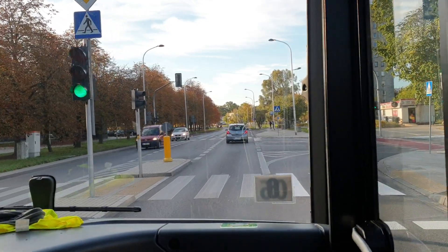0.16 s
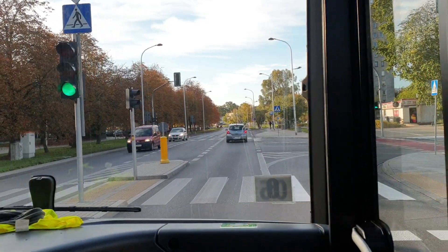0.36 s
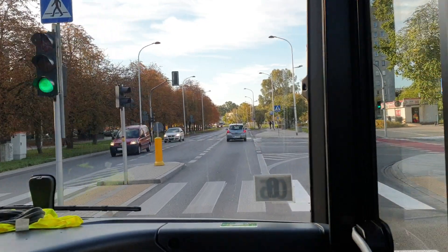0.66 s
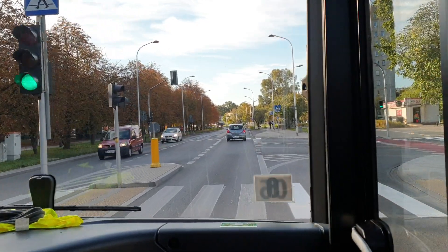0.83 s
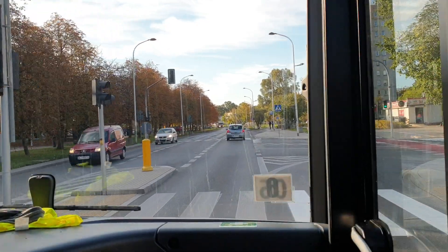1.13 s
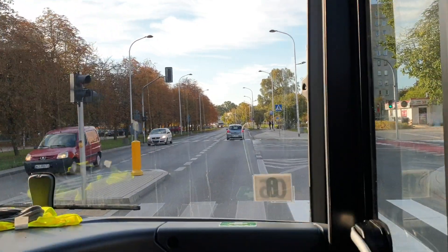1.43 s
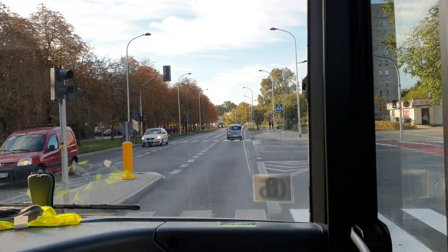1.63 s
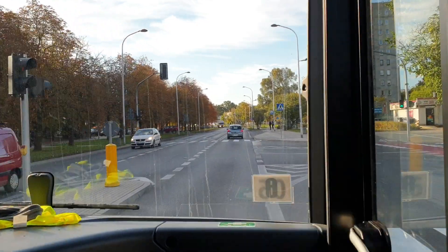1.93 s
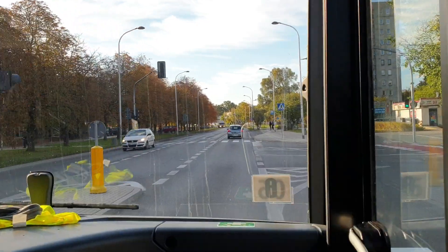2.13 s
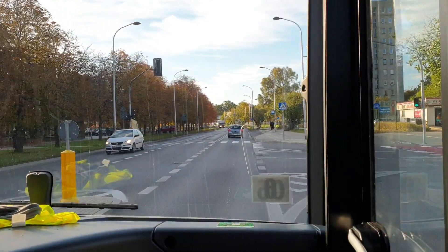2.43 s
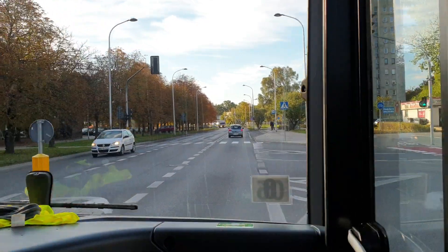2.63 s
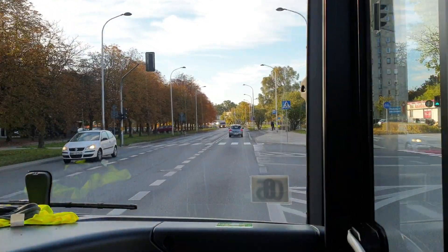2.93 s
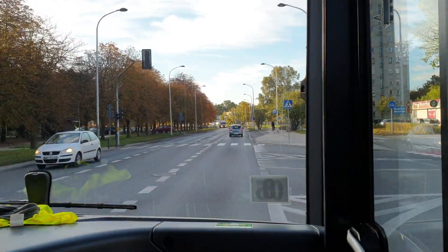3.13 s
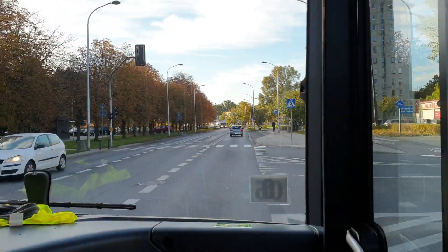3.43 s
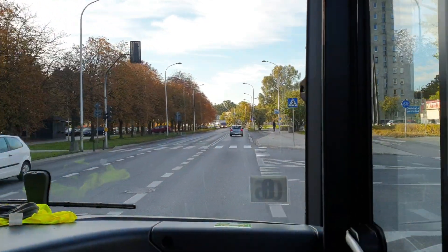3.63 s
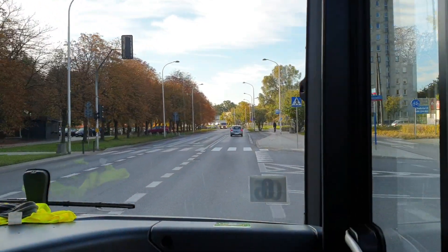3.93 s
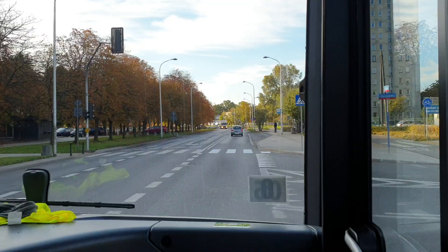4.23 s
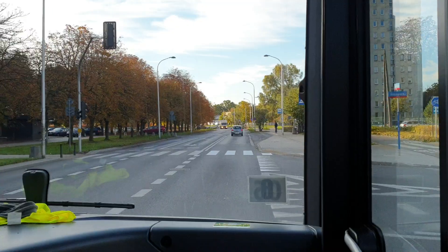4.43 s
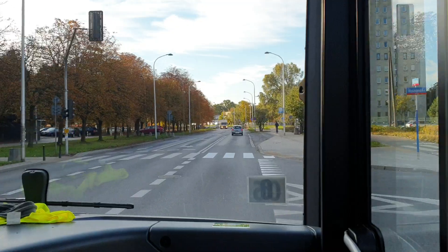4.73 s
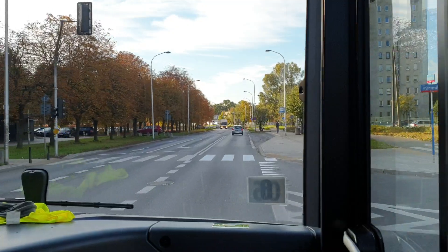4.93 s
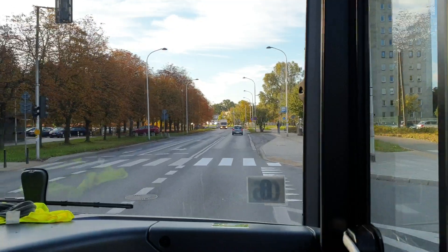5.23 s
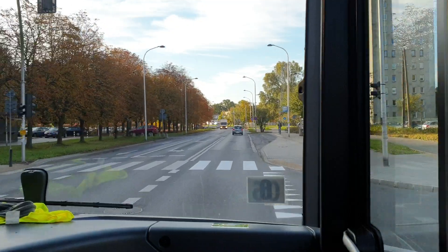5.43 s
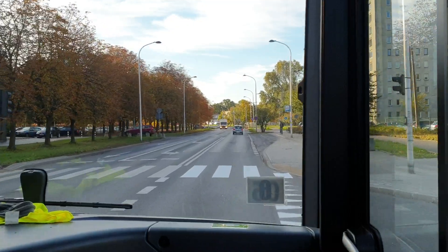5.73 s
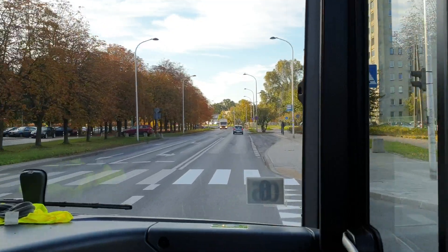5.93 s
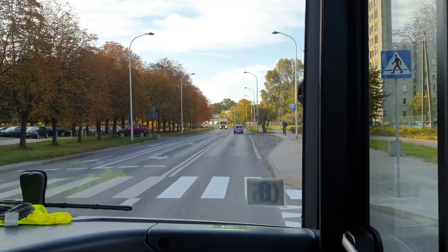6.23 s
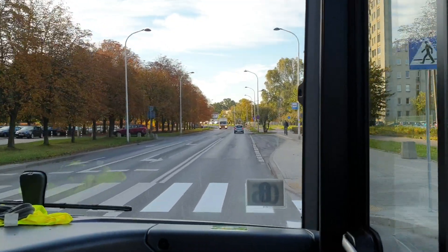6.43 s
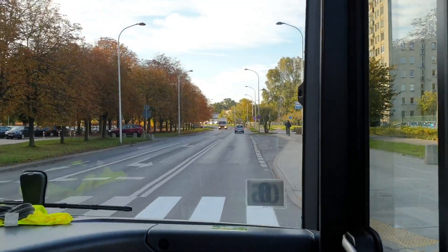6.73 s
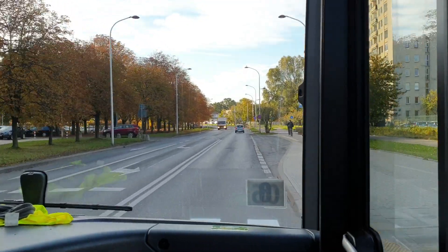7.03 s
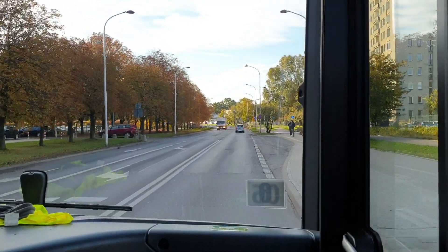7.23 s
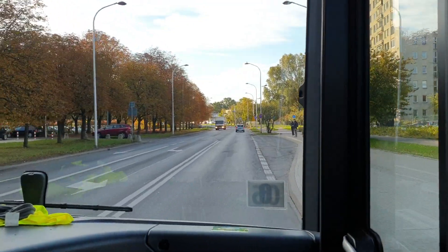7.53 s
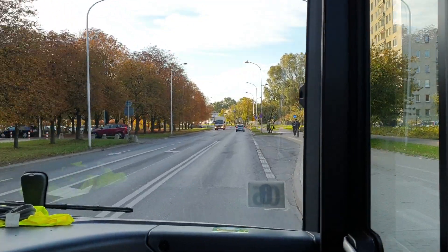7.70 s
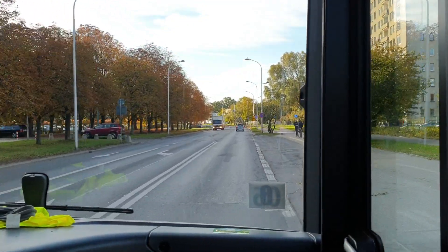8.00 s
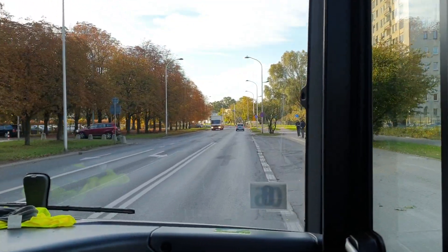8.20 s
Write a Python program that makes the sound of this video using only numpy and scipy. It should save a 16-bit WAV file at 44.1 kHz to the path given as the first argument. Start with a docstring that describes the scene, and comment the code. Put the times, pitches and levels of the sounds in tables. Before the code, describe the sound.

Inside an electric bus pulling away, a steady deep hum drones while tyre rumble grows, trim panels rattle and faint air puffs hiss.

```python
"""A compressor drones at a fixed shaft speed inside an electric city bus that pulls away, heard near the windscreen:
sines on shaft orders. Gliding sines make the driveline moans, the motor whine and the inverter tones.
Shaped noise makes the tyre and air rush, the singing duct and the puffs of the air valves.
Noise bursts through resonances rattle the trim panels, louder on the right; short damped rings click close by."""
import sys
import numpy as np
from scipy import signal
from scipy.fft import rfft, irfft, next_fast_len
from scipy.io import wavfile
from scipy.ndimage import uniform_filter1d, map_coordinates

SR = 44100
rng = np.random.default_rng(int(sys.argv[2]) if len(sys.argv) > 2 else 0)


def master_out(mix):
    """Clip the mix to full scale and print it as 16-bit PCM to the path in sys.argv[1]."""
    frames = np.transpose(np.atleast_2d(mix))
    ceiling = np.clip(frames, -1, 1)
    pcm = np.round(ceiling * 32767).astype(np.int16)
    wavfile.write(sys.argv[1], SR, pcm)


N = 368675

# stereo image: (frequency [Hz], left-right likeness [0..1], left-right level [dB], lead of the left [rad])
STEREO_IMAGE = [(35, .93, -2, .6), (130, .95, -2, .2), (240, .82, -.5, 0), (330, .45, 0, 0),
                (520, .55, -2.5, .4), (900, .3, -4, 1.3), (1200, .35, -7, 2.8), (1450, .15, -9, 3.5),
                (2000, .05, -1, 3.5), (3000, 0, -1.5, 3.5), (15000, 0, 0, 3.5)]
# motor whine pitch, which also stands for road speed: (time [s], pitch [Hz])
WHINE_PITCH = [(0, 900), (1.7, 1510), (2.5, 1800), (3.2, 2010), (4.2, 2250), (4.75, 2395), (5.25, 2482),
               (5.6, 2520), (6.3, 2550)]


def amp(db):
    """Gain of a level in dB."""
    return 10 ** (np.asarray(db) / 20)


def unit(x):
    """x at rms 1."""
    return x / np.sqrt(np.mean(x ** 2) + 1e-20)


def along(points, hz):
    """Columns of (Hz, value, ..) points, interpolated on a log axis."""
    f, *cols = np.transpose(points)
    return np.squeeze([np.interp(np.log(hz + 1), np.log(f + 1), c) for c in cols])


def curves(rows):
    """One value per sample for each column after the time."""
    s, *cols = np.transpose(rows)
    return [np.interp(np.arange(N) / SR, s, c) for c in cols]


def wobble(knots_per_s):
    """Smooth random curve through normally distributed knots."""
    knots = rng.standard_normal(int(N * knots_per_s / SR) + 4)
    return map_coordinates(knots, [np.arange(N) * knots_per_s / SR])


def gate(start_s, end_s, fade_s):
    """Linear fade in from the start and out to the end."""
    t = np.arange(N) / SR
    return np.clip(np.minimum(t - start_s, end_s - t) / fade_s, 0, 1)


def filtered(x, response):
    """x times a complex response of frequency."""
    m = next_fast_len(x.shape[-1] + 8192)
    spectrum = rfft(x, m) * response(np.fft.rfftfreq(m, 1 / SR))
    return irfft(spectrum, m)[..., :x.shape[-1]]


def panned(x, side_db):
    """Stereo with a left-right level difference."""
    return x * amp([[side_db / 2], [-side_db / 2]])


def tone(hz, rms_db, lead_rad=0):
    """Stereo sine on a pitch curve; the left leads in phase."""
    phase = 2 * np.pi * np.cumsum(hz * np.ones(N)) / SR + rng.uniform(0, 2 * np.pi)
    return np.sqrt(2) * amp(rms_db) * np.sin([phase + lead_rad, phase])


def modes(table, hz):
    """Causal response of resonances (Hz, width Hz, dB), summed with alternating sign."""
    total = 0
    for i, (center_hz, width_hz, db) in enumerate(table):
        damping = 1j * hz * width_hz
        total = total + (-1) ** i * amp(db) * damping / (center_hz * center_hz - hz * hz + damping)
    return total


def rush(spectrum, patchy_db):
    """Diffuse stereo noise of rms 1: random gain patches in time and frequency, then spectrum and stereo image."""
    z = signal.stft(rng.standard_normal((2, N)), nperseg=512)[2]
    patches = rng.standard_normal(z.shape[1:])
    patches = uniform_filter1d(uniform_filter1d(patches, 6, 0), 10, 1)
    pair = signal.istft(z * amp(patchy_db * unit(patches)), nperseg=512)[1][:, :N]

    def mid_side(hz):
        angle = np.arccos(along(STEREO_IMAGE, hz)[0]) / 2  # sets the likeness of left and right
        return amp(along(spectrum, hz)) * [np.cos(angle), np.sin(angle)]

    def lean(hz):
        _, side_db, lead_rad = along(STEREO_IMAGE, hz)
        return amp(np.outer([.5, -.5], side_db)) * np.exp(np.outer([.5j, -.5j], lead_rad))

    mid, side = filtered(pair, mid_side)
    return unit(filtered(np.array([mid + side, mid - side]), lean))


def compressor():
    """Lines on multiples of one steady shaft; cabin modes make each louder on one side, the second order booms."""
    shaft_hz = 51.213
    boom_db, sway_s = -20.5, .11
    # brief dips and swells of the boom: (time [s], level change [dB])
    boom_sways = [(5.33, -1), (6.85, -2), (7.06, -0.5), (7.87, 1.3), (8.02, -0.5)]
    # shaft orders: (multiple of shaft speed, mean level [dB], left-right level [dB])
    orders = [(1, -36, -1.5), (4, -45.5, -2.5), (5, -57, -1), (9, -60, 0), (13, -55.5, -2),
              (19, -72, -18.5), (24, -71, -7), (25, -72, -12), (26, -73.5, -17), (27, -64.5, -6),
              (28, -77, -10), (29, -75, -14), (39, -86, 11.5), (48, -77, 4), (73, -93, 2)]
    t = np.arange(N) / SR
    boom_db = boom_db + sum(db * np.exp(-((t - s) / sway_s) ** 2) for s, db in boom_sways)
    hum = panned(tone(2 * shaft_hz + .04 * wobble(3), boom_db + .5 * wobble(7), lead_rad=.3), -2.1)
    for k, db, side_db in orders:
        lead_rad = along(STEREO_IMAGE, k * shaft_hz)[2] * (k < 29)
        hum += panned(tone(k * shaft_hz, db + 1.1 * wobble(3), lead_rad), side_db)
    return hum


def moans():
    """Driveline moans and shudders: each sine glides upward, swells to its middle and fades."""
    # (start [s], length [s], from [Hz], to [Hz], middle level before flutter [dB], waver [Hz])
    glides = [(0.198, .7, 398, 492, -49.5, 9), (0.481, 0.62, 134, 169, -37.5, 4.1),
              (1.195, 0.64, 140, 171.7, -35.5, 3), (1.902, .4, 53.5, 57.3, -28, 0.57),
              (2.256, .26, 56.1, 59.3, -22.5, 0.91), (2.442, .72, 58.1, 60.6, -23.5, 0.59),
              (3.005, 0.58, 60, 66.2, -30, 0.97), (6.208, 0.66, 59.2, 63.4, -30.5, .8)]
    edge_drop_db = 17.5  # start and end against the middle
    out, waver, flutter_db = 0, wobble(25), 1.5 * wobble(25)
    for start_s, length_s, from_hz, to_hz, db, waver_hz in glides:
        u = (np.arange(N) / SR - start_s) / length_s
        hz = from_hz + (to_hz - from_hz) * np.clip(u, 0, 1)
        swell_db = db - edge_drop_db * (2 * u - 1) ** 2
        out = out + tone(hz + waver_hz * waver, swell_db + flutter_db, lead_rad=.2)
    return panned(out, -2)


def road():
    """Tyre and airflow noise through floor and glass in four bands that rise with speed, plus air and a duct."""
    # noise spectra, lowest band first: (frequency [Hz], relative density [dB per Hz])
    thud_spectrum = [(12, -30), (20, -20), (33, -5.5), (42, -2.5), (60, 5), (78, -0.5), (115, -3.5),
                     (135, -10.5), (180, -120)]
    body_spectrum = [(90, -120), (115, -6.5), (130, -1.5), (158, -2.5), (185, -8), (262, -7.5), (320, -15),
                     (500, -18.5), (720, -22.5), (900, -27.5), (1300, -120)]
    tyre_spectrum = [(450, -120), (700, 0), (850, -4), (1050, -2), (1350, -1.5), (1550, -7), (1750, -10.5),
                     (2300, -16.5), (2700, -23), (3000, -33.5), (4000, -120)]
    hiss_spectrum = [(1800, -120), (2500, -5), (2850, 0.5), (3500, -3), (4300, -8), (5250, -11.5),
                     (5600, -23), (6500, -32.5), (9000, -120)]
    air_spectrum = [(3500, -120), (5200, -11.5), (6200, -9), (7700, -16.5), (8600, -10), (9200, -3),
                    (9700, 1.5), (11300, -3), (12000, -7), (15500, -8)]
    # road roughness before each band's share: (time [s], level [dB])
    roughness = [(0, 0.5), (1.6, -0.5), (2.8, 0.5), (3.7, -0.5), (4.35, 0), (5.2, -1.8), (5.7, 0.5),
                 (6.4, -1), (6.9, 2), (7.4, -2.5), (8.3, 2.5)]
    (whine_hz,), (rough_db,) = curves(WHINE_PITCH), curves(roughness)
    slow = 1 - whine_hz / whine_hz.max()
    bumps = wobble(9)  # road unevenness shared by the four bands

    def level(full_db, lost_db, rough_share, bump_db):
        return amp(full_db - lost_db * slow + rough_share * rough_db + bump_db * bumps)

    out = level(-34, 7.4, 2.4, .64) * rush(thud_spectrum, patchy_db=1.0)
    out += level(-38, 8.8, 1, .6) * rush(body_spectrum, patchy_db=1.3)
    out += level(-51.5, 5.4, .31, 1.0) * rush(tyre_spectrum, patchy_db=.44)
    out += level(-73, 6.5, 1.3, .81) * rush(hiss_spectrum, patchy_db=2)
    out += amp(-79.0 + .7 * wobble(4)) * rush(air_spectrum, patchy_db=3)
    # a ventilation duct sings on noise
    duct_hz, duct_width_hz, duct_rms_db = 571, 20, -53
    draught = rush([(300, -120), (450, -1.0), (700, -1.5), (1000, -120)], patchy_db=-2.3)
    duct = filtered(draught, lambda f: modes([(duct_hz, duct_width_hz, 0)], f) ** 2)
    return out + amp(duct_rms_db) * unit(duct)


def rattles():
    """Knocks chatter a few ms into the panel modes; fainter random ones grow denser with time."""
    # panel resonances: (frequency [Hz], width [Hz], gain [dB])
    panel = [(444, 170, 4.5), (850, 360, -2.5), (1110, 33, 8), (1527, 130, 4.5), (1796, 96, -2.5),
             (2020, 330, -5), (2500, 310, -4), (3300, 630, -19)]
    # knocks: (time [s], relative strength [dB], low part [dB], high part [dB])
    knocks = [(3.0788, -29, 5.5, -5), (3.4925, -27, -1, 0), (3.6028, -30.5, 4, -4),
              (3.911, -35.5, -.5, -.5), (3.941, -36.5, 0, 2.5), (3.9982, -36.5, -1, -1),
              (4.2712, -31.5, .5, -3.5), (4.3647, -30, 3.5, -3), (4.5311, -32, 6, 2),
              (4.578, -33, .5, -7.5), (4.627, -31, 0, 2.5), (4.727, -31, 6, -4.5), (5.688, -32.5, 0, -4),
              (5.73, -34.5, 9, -1), (5.772, -34.5, 6, 1.5), (5.833, -30.5, 6.5, -2), (5.8695, -27, 6, -4),
              (5.9205, -33.5, -4.5, -6), (5.9797, -29.5, -2, 0), (6.2365, -34.5, -2, 4.5),
              (6.292, -35, -4.5, -5), (6.678, -32.5, -3, -3.5), (6.989, -31, -1.5, 4.5),
              (7.075, -35, 3, -6), (7.1006, -35, -3, 2), (7.1297, -28.5, 7.5, 0), (7.1875, -35, 0, -1.5),
              (7.635, -34.5, -5.5, -5.5), (7.678, -29, 9, 1), (7.7221, -33.5, 0, -2), (7.78, -36, -2, -5),
              (7.835, -36, 0, 0), (7.8963, -25, 1, -8), (8.0078, -27.5, 2, 4), (8.0555, -36, 0, 1),
              (8.1105, -32.5, 7, -4), (8.1655, -35, -3.5, 1), (8.2245, -30.5, 5, -7), (8.271, -31.5, 0, -5),
              (8.327, -30, -1.5, -4)]
    # left channel against right: (frequency [Hz], level [dB], lead of the left [rad])
    panel_left = [(600, -3, 2.5), (1000, -9, 1.6), (1750, -9, 1.6), (2100, -2, 3.6), (3500, -2, 4.4)]
    first_s, faint_count, faint_db, faint_high_db = 2.8, 90, -44, -2.5
    chatter_s = .008
    when_s = first_s + (N / SR - first_s) * rng.random(faint_count) ** .7
    strength_db = faint_db + 2.5 * rng.standard_normal(faint_count)
    faint = np.c_[when_s, strength_db, np.zeros(faint_count), np.full(faint_count, faint_high_db)]
    t = np.arange(SR // 10) / SR
    envelope = .8 * np.exp(-(t / chatter_s) ** 2) + .17 * amp(-60 * t / .3)
    out = np.zeros((2, N + len(t)))
    for s, db, low_db, high_db in list(knocks) + list(faint):
        chatter = rng.standard_normal((2, len(t))) * envelope
        chatter[1, 0] = 12  # the first contact is the hardest
        chatter[0] = .4 * chatter[1] + .9 * chatter[0]
        tilt = lambda f: amp(np.interp(f, [840, 1010, 1770, 2030], [low_db, 0, 0, high_db]))
        knock = filtered(chatter, lambda f: modes(panel, f) * tilt(f))
        out[:, round(s * SR):][:, :len(t)] += amp(db) * knock

    def contact(f):
        soft = 1 / (1 + 1j * f / 4500) ** 3  # padded contacts carry little treble
        left_db, lead_rad = along(panel_left, f)
        return soft * [amp(left_db) * np.exp(1j * lead_rad), np.ones(len(f))]

    return amp(4.5) * filtered(out[:, :N], contact)


def clicks():
    """Dry close snaps: a contact-limited edge and barely one cycle of ring, with a faint scrape around the loudest."""
    # (time [s], relative strength [dB], pitch [Hz], edge cutoff [Hz], left-right level [dB])
    snaps = [(.1608, -46, 2300, 4500, -20), (.167, -31, 950, 2600, -22), (.1678, -35, 12000, 19000, -23),
             (.347, -45, 2000, 4500, -20.5), (.634, -32, 500, 2800, 15), (.6374, -42, 2950, 5000, -5.5),
             (.6579, -35.5, 4300, 5500, -1.5), (.6579, -27.5, 1900, 3000, -1.5),
             (.6658, -35.5, 3700, 6000, 3), (.6658, -21.5, 1800, 3000, 5), (.666, -19, 460, 2300, 7.5),
             (.6684, -16, 190, 700, 9.5), (3.0362, -36, 1500, 4200, -7.5), (7.7107, -45, 3800, 7000, 0)]
    t = np.arange(SR // 25) / SR
    out = np.zeros((2, N))
    for s, db, hz, edge_hz, side_db in snaps:
        ring = np.cos(2 * np.pi * hz * t) * np.exp(-t * hz / .85)
        fuzz = .11 * rng.standard_normal((2, len(t))) * np.exp(-t / .0015)
        edge = lambda f: 1 / (1 + 1.4j * f / edge_hz - (f / edge_hz) ** 2) ** 3
        snap = filtered(ring + fuzz, edge)
        out[:, round(s * SR):][:, :len(t)] += panned(amp(db) * snap, side_db)
    scrape_start_s, scrape_end_s, scrape_db = .63, .68, -71
    scrape_hz, scrape_width_hz = 3900, 1500
    grain = amp(3 * wobble(300))
    grit = grain * filtered(rng.standard_normal(N), lambda f: modes([(scrape_hz, scrape_width_hz, 0)], f) ** 2)
    out += amp(scrape_db) * gate(scrape_start_s, scrape_end_s, .02) * unit(grit)
    return filtered(out, lambda f: 1j * f / (120 + 1j * f))  # high-pass


def valves():
    """Puffs of compressed air: quick opening, then fading jet noise in a high and a lower band."""
    # (time [s], level before opening and sputter [dB], lower band against high [dB], time to fade 20 dB [s])
    puffs = [(.1221, -73, -8, .1), (.42, -75, -9, .1), (1.1428, -74, -9, .08), (1.99, -75, -6, .09),
             (3.3473, -70, -8, .07), (3.494, -73, 2, .1), (5.45, -65, -4, .1), (5.8686, -75, 6, .06),
             (6.13, -69, -6, .07), (6.1754, -67, -1.5, .1), (6.5286, -68, 9, .13),
             (6.7221, -67.5, -12, .13), (6.7905, -69, 3, .1), (6.83, -68, 1, .19), (6.992, -64.5, -1, .11),
             (7.1422, -67, -19, .03), (7.2444, -71, -14.5, .03), (7.3612, -70, -5, .09),
             (7.4669, -69, -19, .04), (7.5742, -70, -3, .1), (7.7099, -61.5, .5, .08), (7.83, -82, 13, .16),
             (8.1668, -68, -8, .08), (8.1883, -71, -4, .11), (8.3105, -68, 2, .07)]
    # jet spectra: (frequency [Hz], relative density [dB per Hz])
    jet_high = [(5000, -120), (6500, -19), (8500, -13.5), (9200, -3), (10200, -1.5), (11400, -3.5),
                (12200, -12), (15500, -14)]
    jet_low = [(1200, -120), (2000, -19.5), (2700, 6.5), (3500, 3.5), (5200, -8.5), (5800, -7), (7000, -11),
               (9500, -120)]
    nozzle_hz, nozzle_width_hz, nozzle_db = 5000, 160, 6  # the lower band rings here
    open_s, low_open_s = .0018, .002
    high, low, t = np.zeros(N + SR), np.zeros(N + SR), np.arange(SR // 2) / SR
    for s, db, low_db, fade_s in puffs:
        flow = amp(db - 20 * (t / max(fade_s, .01)) ** 2) * (1 - np.exp(-t / open_s))
        high[round(s * SR):][:len(t)] += flow
        low[round(s * SR):][:len(t)] += flow * amp(low_db) * (1 - np.exp(-t / low_open_s))
    high_jet = rush(jet_high, patchy_db=2)
    nozzle = lambda f: 1 + modes([(nozzle_hz, nozzle_width_hz, nozzle_db)], f)
    low_jet = filtered(rush(jet_low, patchy_db=3), nozzle)
    sputter = amp(1.8 * wobble(70))  # uneven flow
    return sputter * (high[:N] * high_jet + low[:N] * low_jet)


def drive():
    """Motor whine, and inverter tones that spread from their carrier as the motor current speeds up."""
    # switching rates, stepping up: (start [s], end [s], carrier [Hz], base level near it [dB], near its double [dB])
    carriers = [(.8, 4.17, 4000, -85, -101.5), (4.1, 6.12, 4999, -89, -84)]
    # swell of the inverter tones: (time [s], near the carrier [dB], near its double [dB])
    tone_swell = [(3.2, -2, 0), (3.42, 6, 0), (3.7, -2, 0), (4.05, 4, 0), (4.3, 5, 3), (4.7, 2, 1),
                  (5.1, 0, 0), (5.38, -6, 5), (5.52, 7, 2), (5.75, -3, -5), (6.1, -5, -8)]
    # (multiple of carrier, multiple of current frequency, relative level [dB])
    sidebands = [(1, -3, -2), (1, 3, -1), (2, -2, -1.5), (2, 0, 0), (2, 2, -1.5)]
    whine_db, peak_hz, peak_width_hz, peak_lift_db = -78.5, 2472, 70, 14.5  # a resonance lifts the whine
    pull_start_s, pull_end_s = 1.3, 5.75
    whine_per_current = 21.4  # frequency ratio
    slow_loss_db = 30  # lost near the carrier as whine pitch goes to zero
    whine_hz, = curves(WHINE_PITCH)
    level_db = whine_db + peak_lift_db / (1 + ((whine_hz - peak_hz) / peak_width_hz) ** 2)
    whine = tone(whine_hz + 5 * wobble(9), level_db + 2.5 * wobble(12), lead_rad=1.5)
    out = gate(pull_start_s, pull_end_s, .3) * whine
    drift_hz = 4 * wobble(8)
    # thin converter tone, on from the outset
    out += gate(-1, 4.15, .1) * tone(9998 + drift_hz, -92 + 3 * wobble(15), lead_rad=1.1)
    slow = 1 - whine_hz / whine_hz.max()
    near_swell_db, double_swell_db = curves(tone_swell)
    for m, k, db in sidebands:
        flicker_db = 3.5 * wobble(7) + 2 * wobble(30)
        for start_s, end_s, carrier_hz, near_db, double_db in carriers:
            if m == 1:
                band_db = near_db + near_swell_db - slow_loss_db * slow
            else:
                band_db = double_db + double_swell_db
            hz = m * carrier_hz + k * whine_hz / whine_per_current
            sideband = tone(hz + drift_hz, db + flicker_db + band_db, lead_rad=1.1)
            out += gate(start_s, end_s, .12) * sideband
    return out


def scene():
    """Stereo sum of all sources."""
    return compressor() + drive() + moans() + road() + rattles() + clicks() + valves()


def record(dry):
    """Band limit: nothing passes from 15720 Hz up."""
    return filtered(dry, lambda hz: hz < 15720)


dry = scene()
out = record(dry)
master_out(out)
```